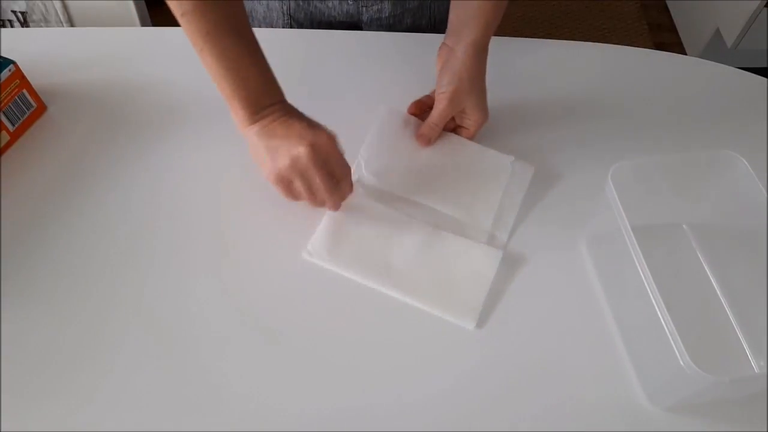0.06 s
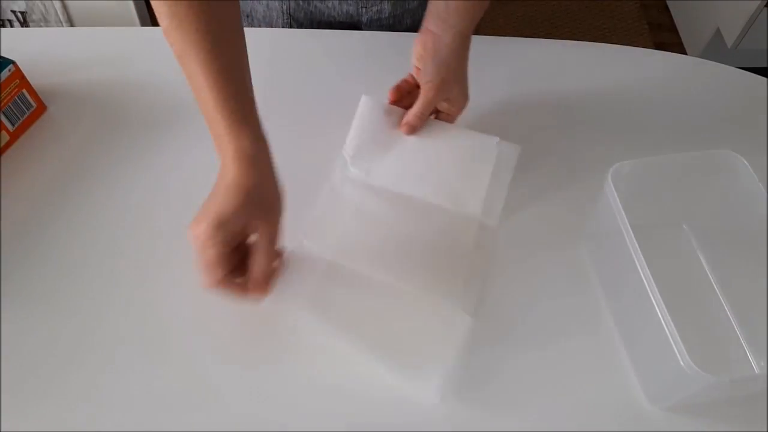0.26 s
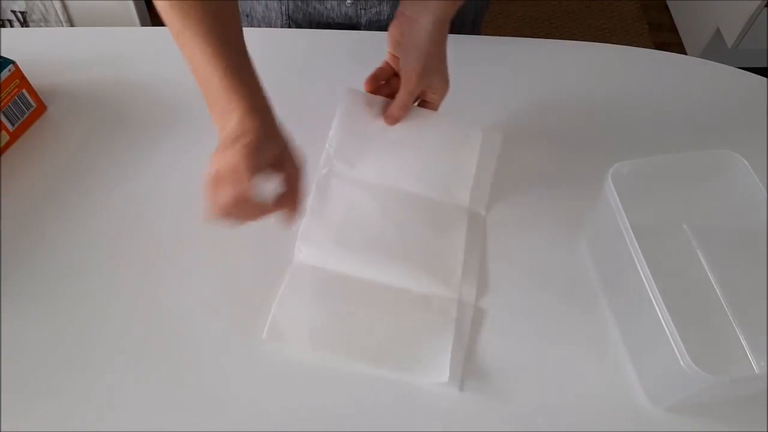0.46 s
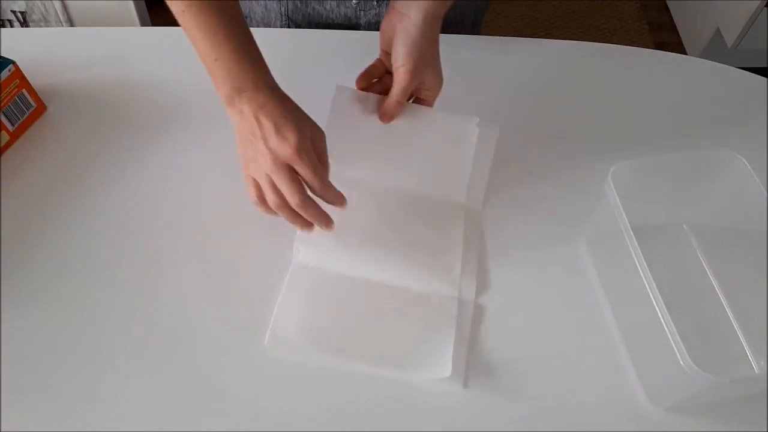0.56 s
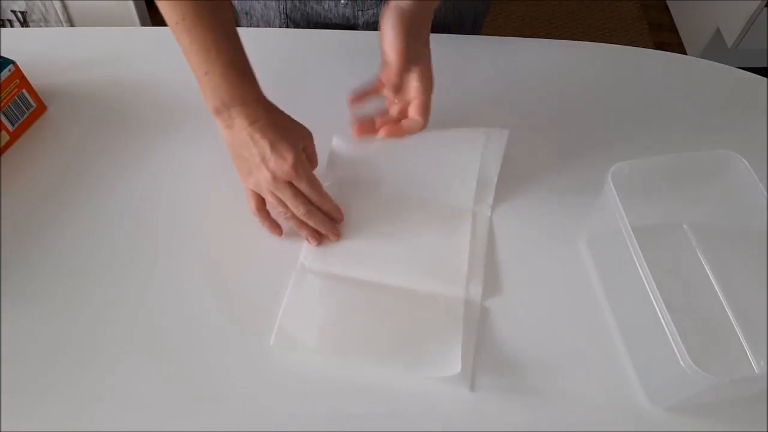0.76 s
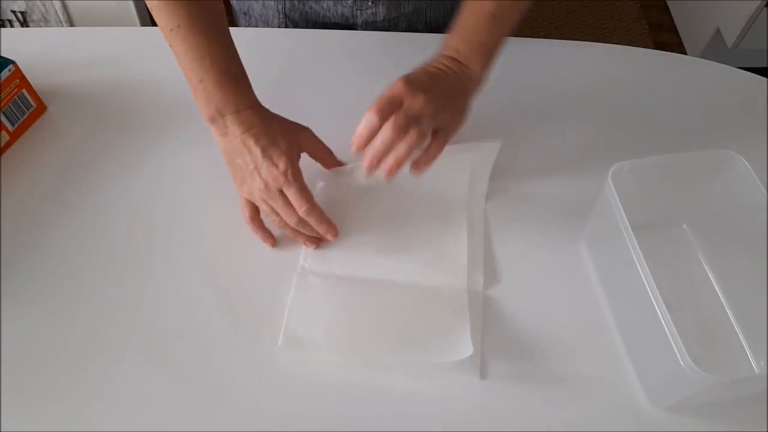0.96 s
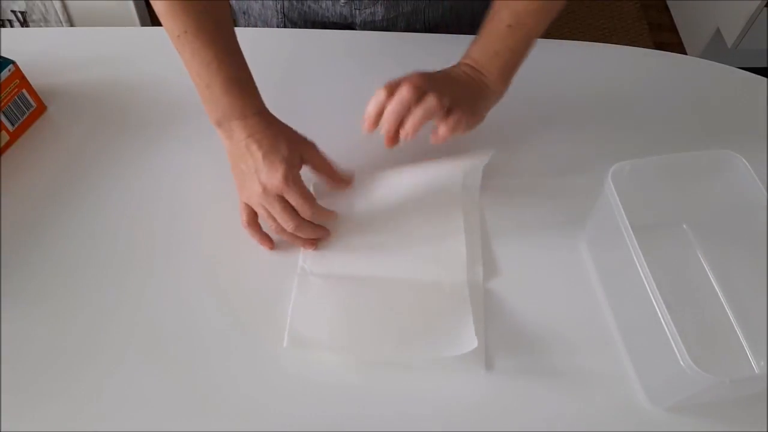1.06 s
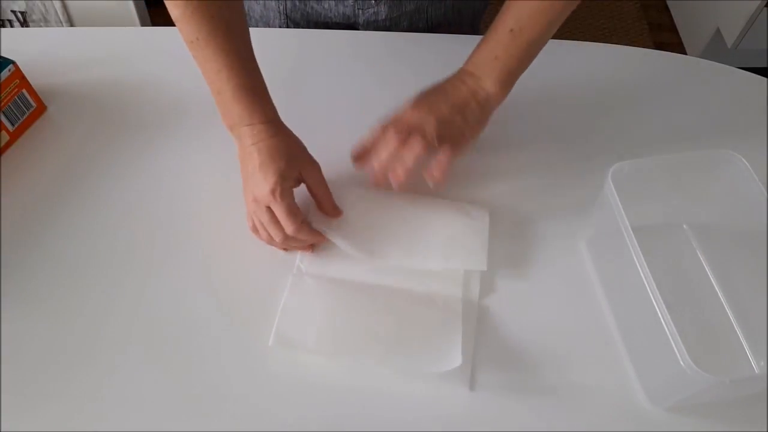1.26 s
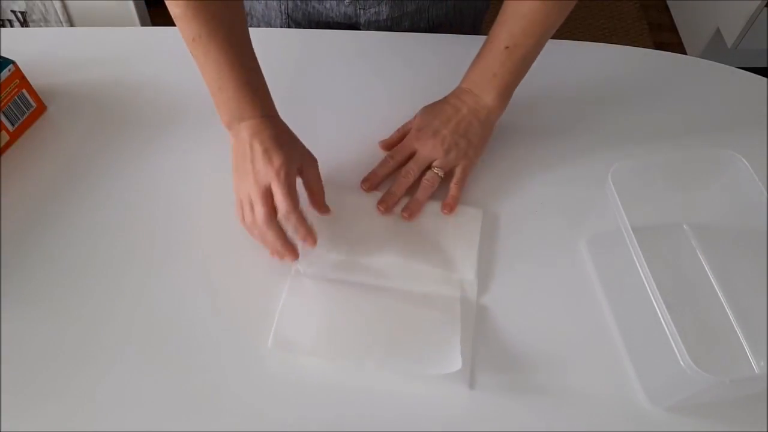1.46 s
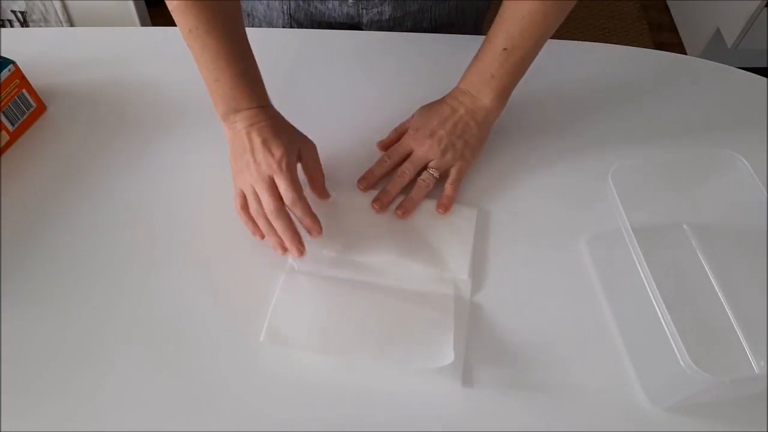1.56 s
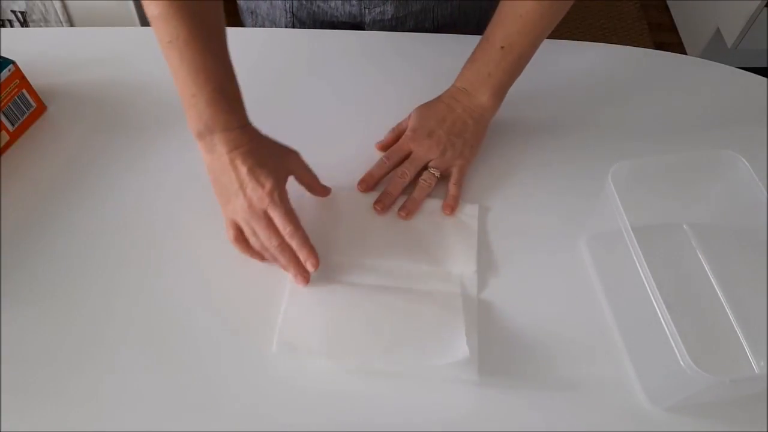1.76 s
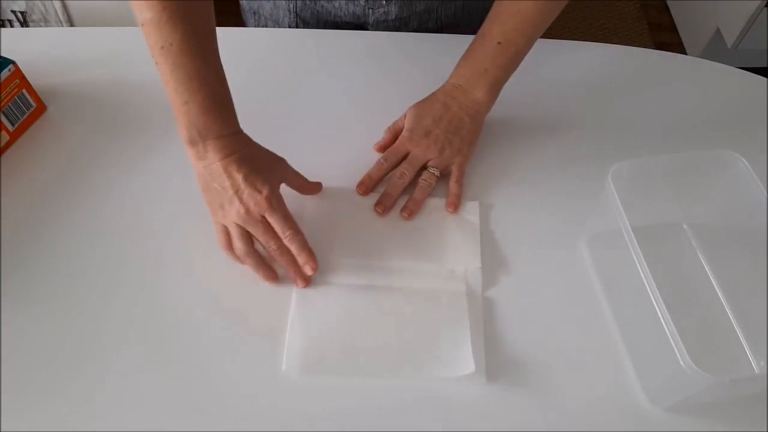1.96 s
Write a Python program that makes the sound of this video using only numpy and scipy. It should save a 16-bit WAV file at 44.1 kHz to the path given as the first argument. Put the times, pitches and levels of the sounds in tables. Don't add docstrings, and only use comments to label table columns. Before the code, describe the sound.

Stiff paper folded and creased by hand, crisp crackles and one hard snap, faint room hum

```python
import sys
import numpy as np
from scipy import signal
from scipy.fft import rfft, irfft
from scipy.io import wavfile
from scipy.ndimage import uniform_filter1d, map_coordinates

SR = 44100
rng = np.random.default_rng(int(sys.argv[2]) if len(sys.argv) > 2 else 0)


def int16_out(signal):
    q = np.round(np.clip(np.atleast_2d(signal).T, -1, 1) * 32767)
    wavfile.write(sys.argv[1], SR, q.astype(np.int16))


def volts_from_db(level):
    exponent = np.asarray(level, float) / 20
    return 10 ** exponent


N = 88200

# (start [s], length [s], level [dB], sheet resonance [Hz], treble [dB])
FLICKS = [(0.0, 0.08, -59.5, 2900, 4.5), (0.121, 0.068, -70.5, 3200, 11), (0.174, 0.017, -49.5, 3360, -14),
          (0.196, 0.0057, -36.5, 2880, 3), (0.21, 0.13, -49, 2220, -4), (0.33, 0.051, -51.5, 2020, 3),
          (0.657, 0.025, -41, 2080, -5), (0.824, 0.07, -52.5, 2450, -9.5),
          (1.015, 0.024, -45.5, 2110, -9.5), (1.122, 0.04, -47, 1620, -3), (1.157, 0.022, -51, 1080, -2),
          (1.324, 0.046, -59.5, 1840, 1), (1.363, 0.0049, -54, 2400, -5), (1.3754, 0.0079, -41, 3000, -4.5),
          (1.516, 0.015, -53, 3000, -5), (1.683, 0.013, -46, 3060, -14), (1.711, 0.034, -48, 2200, -28),
          (0.413, .008, -47, 2400, -16), (.44, .03, -45.5, 3000, -10), (1.924, 0.0046, -54.5, 2420, -1)]
# (start [s], rise [s], level [dB], sheet resonance [Hz], treble [dB])
RUBS = [(0.679, 0.053, -36, 2270, -5), (.74, 0.048, -45.5, 2180, -2.5), (.87, 0.094, -46.5, 1900, -6.5),
        (1.01, 0.073, -48, 2620, -11.5), (1.181, 0.024, -39, 2570, -20), (1.205, 0.038, -44.5, 3000, -10),
        (1.205, 0.045, -45, 5400, -24), (1.25, 0.024, -53.5, 5300, -23), (1.248, 0.026, -41, 2470, -17),
        (1.28, 0.017, -56, 1620, -26), (1.388, 0.052, -41.5, 2280, -2), (1.525, 0.016, -45, 2600, -28),
        (1.55, 0.026, -45, 2280, -16.5), (1.671, 0.013, -53, 2500, -2), (1.76, 0.061, -62.5, 2500, 2),
        (1.89, 0.034, -52.5, 2500, -10.5)]
# (time [s], peak level [dB], pitch [Hz], sheet thud [dB])
CREASES = [(0.034, -46, 8200, -13), (0.0498, -39, 7200, -8), (0.0735, -39, 7250, -8),
           (0.127, -46, 8370, -10), (.1365, -49, 7990, -14), (0.1571, -24.5, 10400, -55),
           (0.2015, -24, 6060, -3), (0.2036, -12.5, 12800, -12), (0.2039, -19.5, 8300, -8),
           (0.2058, -18, 9000, -10.5), (.278, -33, 8000, -6), (0.3345, -36, 5950, -4),
           (.3385, -34, 9000, -10), (.347, -36, 7000, -3), (0.371, -33, 8350, -16), (0.424, -19, 6500, -32),
           (0.4263, -15, 8000, -27), (0.684, -28, 10000, -6), (0.71, -31, 9000, -10),
           (0.7402, -38, 7500, -10), (0.7800, -32, 11000, -2), (0.856, -38, 9000, -8),
           (0.9548, -25, 8500, -23), (0.9552, -25, 9100, -22), (1.0214, -48, 5800, -20),
           (1.13, -33, 4830, -11), (1.1564, -28, 5100, -16), (1.16, -36, 5000, -12),
           (1.2465, -22, 12000, -20), (1.2485, -26, 6000, -14), (1.3637, -25, 9000, -20),
           (1.3777, -25.5, 5250, -23), (1.4452, -42, 5000, -5), (1.5142, -26, 5460, -15),
           (1.527, -38, 4500, 7), (1.628, -32.5, 6300, -19), (1.6428, -51, 6000, -11),
           (1.653, -48, 5000, -6), (1.6827, -25, 8900, -23), (1.684, -40, 9500, -20),
           (1.689, -32, 4840, -7), (1.8010, -38, 7600, -3), (1.9217, -33, 6000, -6),
           (1.923, -42, 8000, -18)]
# (frequency [Hz], level [dB], t60 [s])
SNAP_MODES = [(1080, -11, 0.01), (1850, -6, 0.0092), (2170, -7.5, 0.011), (3000, -2, 0.0082),
              (3840, -7, 0.0055), (8380, -6, 0.0022), (11100, -8, 0.0013)]
# (time [s], peak level [dB], pitch [Hz], ring t60 [s])
PANEL_POPS = [(.347, -36.5, 1690, 0.0065), (0.4261, -41.5, 299, 0.023), (0.4267, -18.5, 2600, 0.0022),
              (.4320, -34, 1530, .005), (0.4339, -28, 1420, 0.0029), (0.4364, -30, 1910, 0.0092),
              (.4445, -30, 1700, 0.0049), (0.667, -33, 2300, .008), (0.6781, -35.5, 1770, .012),
              (0.713, -28, 2730, 0.005), (0.7224, -35, 1400, 0.0067), (.722, -31, 2140, .012),
              (.733, -41, 2250, 0.013), (.7525, -36, 2080, .01), (0.7649, -37, 1630, 0.0089),
              (.77, -34, 2400, 0.011), (.9393, -35, 2250, 0.0023), (.9455, -46, 2230, 0.0053),
              (1.0203, -46, 2090, 0.0068), (1.131, -39.5, 915, 0.0089), (1.145, -44, 1530, 0.0067),
              (1.1603, -36.5, 966, 0.025), (1.172, -35, 1580, .008), (1.178, -38, 960, 0.013),
              (1.2138, -33, 2750, .01), (1.2486, -32, 2400, 0.0098), (1.2579, -37, 3100, .008),
              (1.2800, -32, 3000, 0.008), (1.305, -36, 1610, 0.0089), (1.3325, -35.5, 1700, .003),
              (1.3773, -42.5, 1010, 0.0039), (1.4321, -30.5, 2050, 0.0047), (1.4455, -29, 3000, 0.0026),
              (1.4522, -35, 2650, 0.0081), (1.5088, -38, 2400, 0.0052), (1.528, -32.5, 3000, 0.0026),
              (1.5493, -34, 2490, .008), (1.5780, -37.5, 2060, 0.014), (1.5825, -35, 2160, 0.021),
              (1.6020, -41, 2600, 0.0092), (1.629, -39, 3000, .003), (1.6985, -31, 2680, .006),
              (1.7093, -31, 2250, 0.0044), (1.7275, -36.5, 2330, .008), (1.7405, -36.5, 1950, 0.0096),
              (1.9140, -40, 2350, 0.0058), (1.9215, -39.5, 1980, 0.01), (1.9219, -34.5, 2600, 0.0078)]
# (time [s], lead of left [samples], left minus right [dB])
HAND_PLACE = [
    (0, 1.9, 2),
    (.2, 3.68, 0),
    (.6, 2.4, 1),
    (1.0, 1.63, 1.5),
    (1.6, 1.1, 2),
    (1.9, 1.9, 1),
]
# (frequency [Hz], t60 [s], level [dB])
ROOM_BANDS = [(330, 0.51, 13), (770, 0.83, -37), (1375, 0.4, 1.5), (2890, 0.5, -1.5), (6160, 0.39, -0.5),
              (10200, 0.37, -2)]
# (frequency [Hz], level [dB])
HUM_TONES = [(90, -62.5), (113, -57), (146, -60.5), (228, -63.5)]
# (frequency [Hz], density [dB per Hz])
RUMBLE_SPECTRUM = [(15, -63), (25, -31), (139, -0.5), (159, -4), (184, -10.5), (226, -9), (252, -16),
                   (358, -15.5), (450, -39.5), (580, -37), (990, -120)]
# (frequency [Hz], density [dB per Hz])
HISS_SPECTRUM = [(240, -11), (400, 5.5), (1040, -6), (1330, -7.5), (2550, 0.5), (5690, -12), (8110, -10.5),
                 (16000, -65)]

SHEET_CUT_HZ = 576
PRESSED_S, PRESSED_CUT_HZ = 1.48, 1360


def level(x, db):
    return x * volts_from_db(db) / np.sqrt(np.mean(x ** 2) + 1e-30)


def band(x, hz, width):
    hz = min(hz, 0.42 * SR)
    return signal.lfilter(*signal.iirpeak(hz, max(hz / width, 0.6), fs=SR), x)


def high(x, hz):
    return signal.sosfilt(signal.butter(3, hz, "high", fs=SR, output="sos"), x)


def walk(rate, size):
    hold = int(SR / rate)
    steps = np.repeat(rng.standard_normal(size // hold + 1), hold)
    return 1.3 * uniform_filter1d(uniform_filter1d(steps, hold), hold)[:size]


def click_swarm():
    clicks_per_s, scatter_db, flutter_db = 7000, 3, 2.36
    biggest = 3.5
    happens = rng.random((2, N)) < clicks_per_s / SR
    strength = rng.standard_normal((2, N)) * volts_from_db(scatter_db * rng.exponential(size=(2, N)))
    clicks = np.clip(level(happens * strength, 0), -biggest, biggest)
    return clicks * volts_from_db(flutter_db * walk(120, N))


def sheet_ring(clicks, hz, q, lower_db, treble_db):
    def mode(f):
        return band(band(clicks, f, f / q), f, 2 * f / q)

    upper = volts_from_db(-7.5 + treble_db / 2) * mode(hz * 1.645)
    lower = volts_from_db(lower_db) * mode(hz * 0.49)
    return mode(hz) + upper + lower


def strokes():
    out = np.zeros((2, N))
    clicks = click_swarm()
    mid, side = level(band(clicks, 7550, 10600), 0)
    treble = mid + volts_from_db(-1) * side * np.array([[1], [-1]])
    # start, attack, length, release [s], Q, lower mode [dB], then level, resonance and treble
    flicks = [(s, 0.004, length, 0.0098, 0.45, -3.5, *rest) for s, length, *rest in FLICKS]
    rubs = [(s, rise, rise, 0.021, 1.15, -11, *rest) for s, rise, *rest in RUBS]
    for start, attack, length, release, q, lower_db, db, hz, treble_db in flicks + rubs:
        i = max(int(start * SR), 0)
        part = slice(i, i + int((length + 7 * release) * SR))
        t = np.arange(len(mid[part])) / SR
        sheet = sheet_ring(clicks[0, part], hz, q, lower_db, treble_db)
        sheet = high(sheet, PRESSED_CUT_HZ if start > PRESSED_S else SHEET_CUT_HZ)
        rise = np.clip(t / attack, 0, 1)
        fall = np.exp(-np.clip(t - length, 0, None) / release)
        rustle = level(sheet, 0) + volts_from_db(treble_db) * treble[:, part]
        out[:, part] += rise * fall * volts_from_db(db) * rustle
    return high(out, SHEET_CUT_HZ)


def creases():
    size, burst_s, q, thud_hz, wide_db = 512, 0.00036, 0.81, 2600, -3
    out = np.zeros(N + size)
    t = np.arange(size) / SR
    for s, db, hz, thud_db in CREASES:
        burst = rng.standard_normal(size) * t / burst_s * np.exp(-t / burst_s)
        tick = band(burst, hz, hz / q) + volts_from_db(wide_db) * np.diff(burst, prepend=0)
        thud = band(band(burst, thud_hz, thud_hz / q), thud_hz, thud_hz)
        i = int(s * SR)
        out[i:i + size] += volts_from_db(db) * (tick / abs(tick).max() + volts_from_db(thud_db) * thud / abs(thud).max())
    return high(out[:N], PRESSED_CUT_HZ)


def snap():
    snap_s, push_s, cut_hz = 0.4253, 0.00009, 900
    echo_s, echo_db = 0.0018, -39
    since = np.arange(N) / SR - snap_s
    t = np.clip(since + 2 * push_s, 0, None)
    modes = sum(volts_from_db(db) * np.sin(2 * np.pi * hz * t) * volts_from_db(-60 * t / t60) for hz, db, t60 in SNAP_MODES)
    push = np.exp(-(since / push_s) ** 2)
    x = high(high(modes / 2 + push, cut_hz), cut_hz / 2)
    x = x + volts_from_db(echo_db) * np.roll(x, int(echo_s * SR))
    return x / abs(x).max() * volts_from_db(-7 + np.array([[-0.75], [0.75]]))


def panel_pops():
    size, rise_cycles = 1024, 0.8
    out = np.zeros(N + size)
    t = np.arange(size) / SR
    for s, db, hz, t60 in PANEL_POPS:
        rise = 1 - np.exp(-(t * hz / rise_cycles) ** 2)
        ring = np.sin(2 * np.pi * hz * t) * rise * volts_from_db(-60 * t / t60)
        ring = high(ring, 0.6 * hz)
        i = int(s * SR)
        out[i:i + size] += volts_from_db(db) * ring / abs(ring).max()
    return out[:N]


def room(x):
    gap_s = 0.00054
    t = np.arange(int(0.7 * SR)) / SR
    onset = np.clip(t / gap_s - 1, 0, 1)
    tail = 0
    for hz, t60, db in ROOM_BANDS:
        mid, side = (band(band(rng.standard_normal(len(t)), hz, hz), hz, hz) for _ in range(2))
        pair = mid + min(hz / 1340, 1) * side * np.array([[1], [-1]])
        tail = tail + volts_from_db(db) * pair * volts_from_db(-60 * t / t60) * onset
    tail = tail / np.sqrt((tail ** 2).sum() / 2)
    return volts_from_db(-3) * signal.fftconvolve(x[None], tail, axes=1)[:, :N]


def coloured(points, side_db):
    f = np.arange(1, N // 2 + 2) * SR / N
    hz, db = np.transpose(points)
    gain = volts_from_db(np.interp(np.log(f), np.log(hz), db, left=-80, right=-80))
    mid, side = irfft(rfft(rng.standard_normal((2, N))) * gain, N)
    return np.array([mid + volts_from_db(side_db) * side, mid - volts_from_db(side_db) * side])


def hum():
    t = np.arange(N) / SR
    tones = 0
    for hz, db in HUM_TONES:
        loudness = volts_from_db(db + walk(7.5, N))
        tones = tones + loudness * np.sin(2 * np.pi * hz * t + walk(4.01, N))
    rumble = level(coloured(RUMBLE_SPECTRUM, -12.5), -52) * volts_from_db(1.4 * walk(4.95, N))
    hiss = level(coloured(HISS_SPECTRUM, -2), -60.5)
    return rumble + tones + hiss


def scene():
    n = np.arange(N)
    place_s, lead, pan = np.transpose(HAND_PLACE)
    pan_db = np.interp(n / SR, place_s, pan)
    ticks = creases()
    paper = strokes() + ticks + panel_pops()
    dry = paper * volts_from_db(np.array([pan_db, -pan_db]) / 2) + snap()
    right = map_coordinates(dry[1], [n - np.interp(n / SR, place_s, lead)], mode="nearest")
    to_room = dry.mean(axis=0) - (1 - volts_from_db(-2)) * ticks
    return np.array([dry[0], right]) + room(to_room) + hum()


def roll_off(x):
    return signal.sosfilt(signal.butter(12, 16720, fs=SR, output="sos"), x)


def record(dry):
    top_cut = signal.ellip(6, 0.5, 30, 15700, fs=SR, output="sos")
    mix = signal.sosfilt(top_cut, dry)
    return roll_off(mix)


dry = scene()
out = record(dry)
int16_out(out)
```